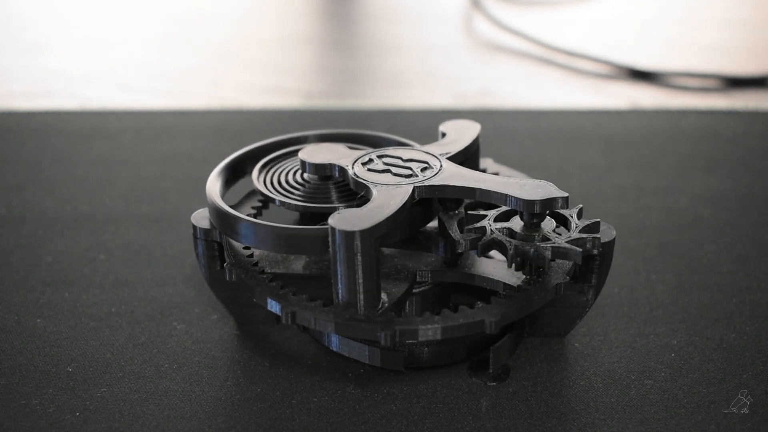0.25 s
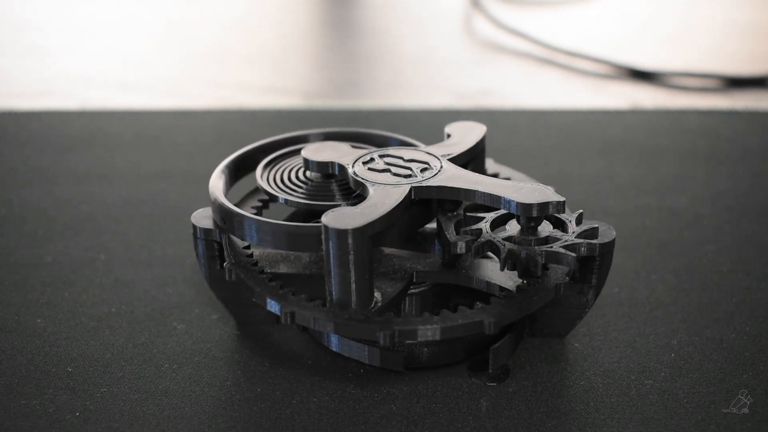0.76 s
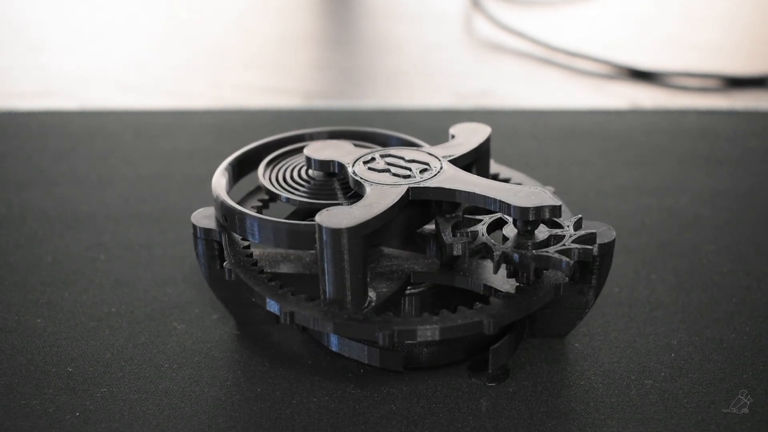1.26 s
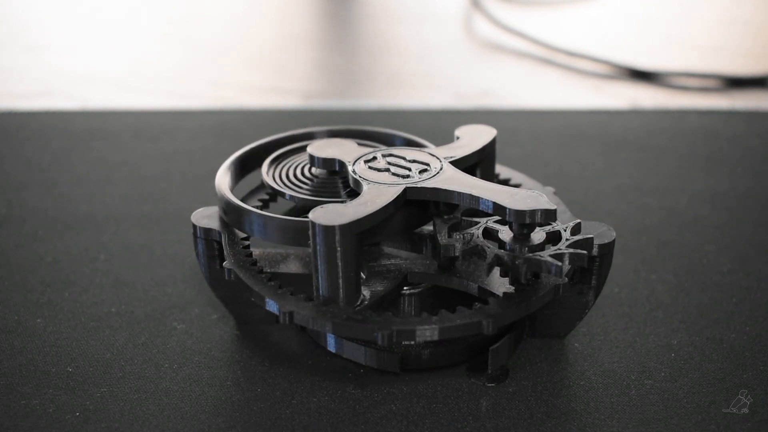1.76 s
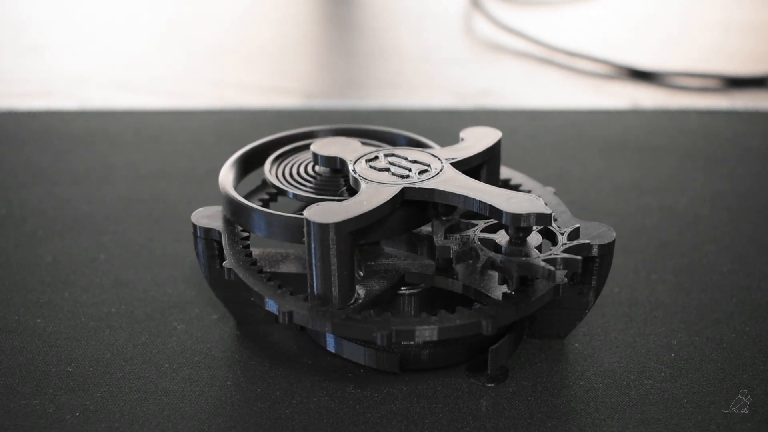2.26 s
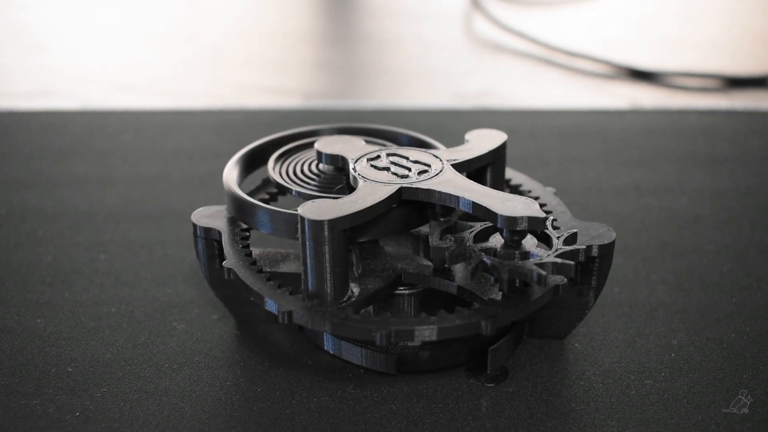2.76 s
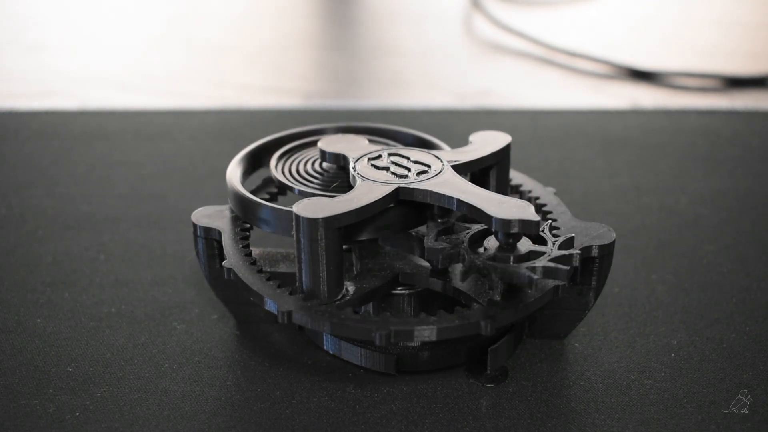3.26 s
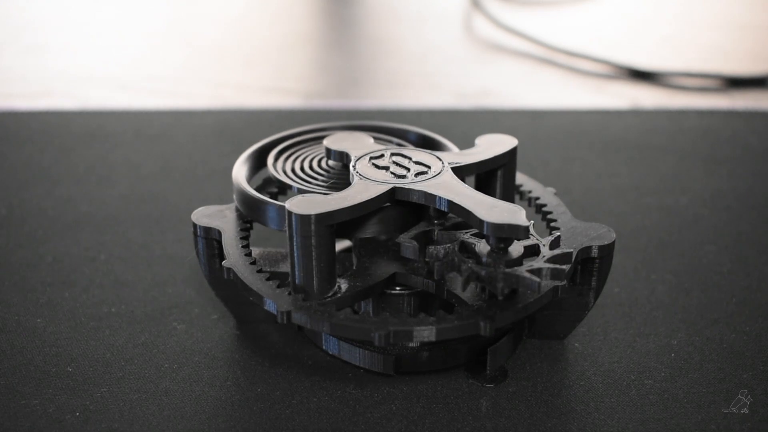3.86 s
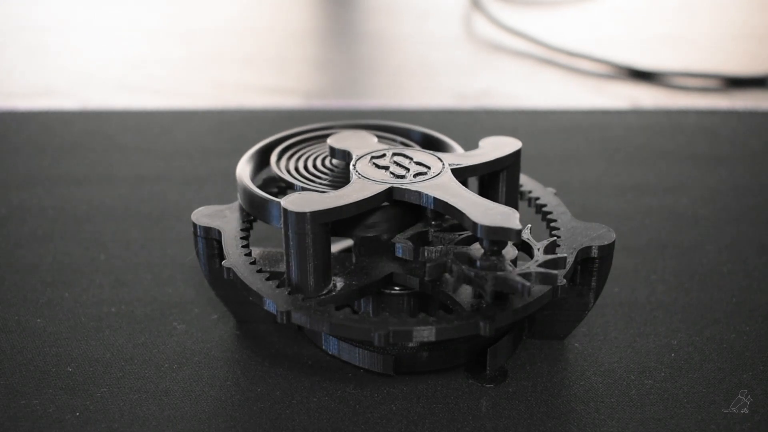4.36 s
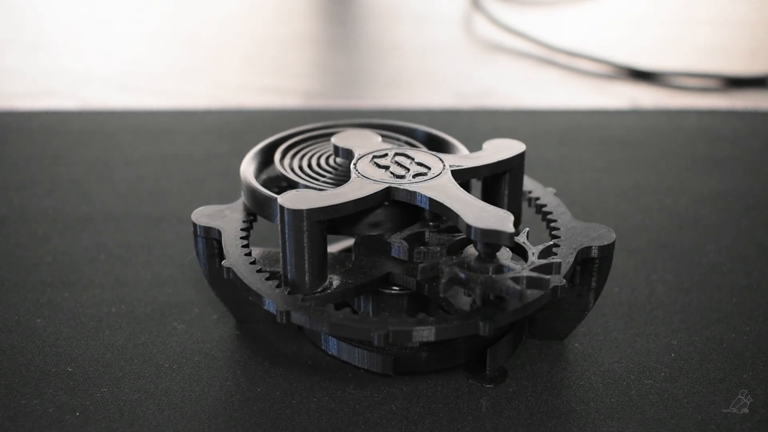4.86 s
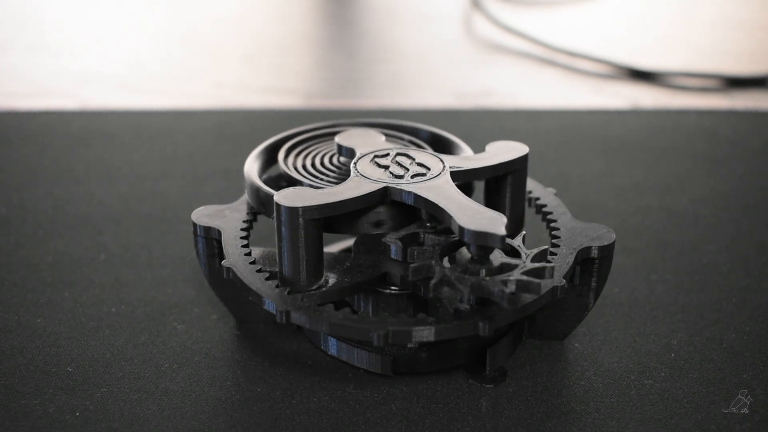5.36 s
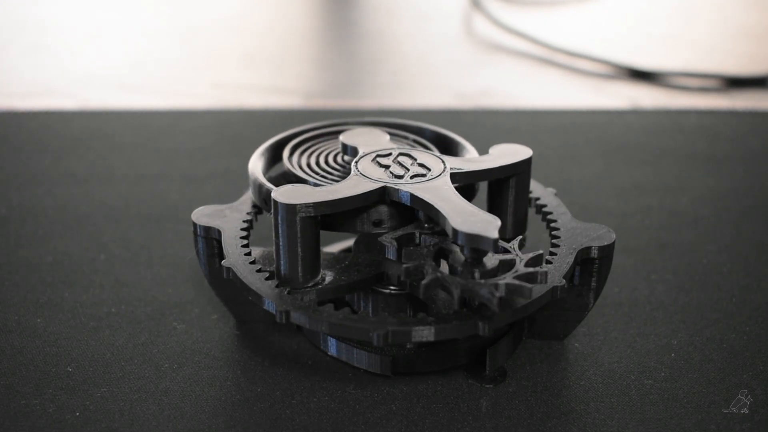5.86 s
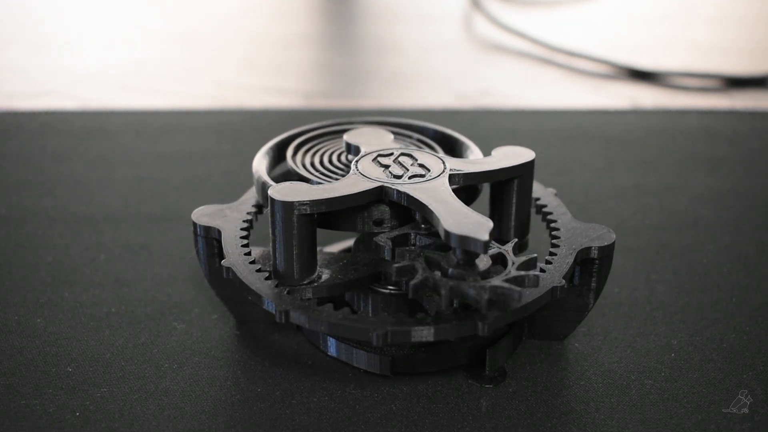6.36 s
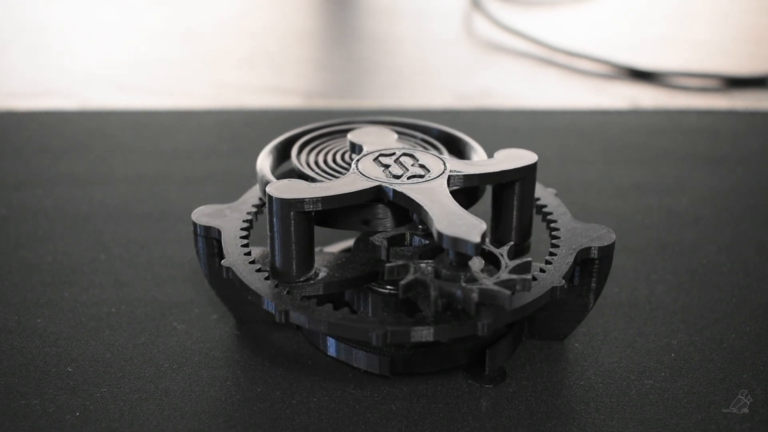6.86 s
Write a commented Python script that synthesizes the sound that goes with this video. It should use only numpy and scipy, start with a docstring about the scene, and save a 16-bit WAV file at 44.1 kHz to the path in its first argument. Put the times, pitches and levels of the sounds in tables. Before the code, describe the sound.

A plastic clockwork mechanism ticks sharply and evenly, about four times a second, over a low hum in a small room.

```python
"""A plastic clockwork escapement ticks on a desk in a small, live room, over ventilation and mains hum.
At each beat, about four a second, the balance unlocks the fork, a tooth pushes the pallet, and the
escape wheel drops with a sharp clack that rings the frame and spring. Two pallets alternate: tick, tock.
From 2.8 to 4.9 s the swing sags and the beat slows a touch, then stays so to the end.
Throughout, the timbre drifts as the carriage slowly turns."""
import sys
import numpy as np
from scipy import signal
from scipy.fft import rfft, irfft, next_fast_len
from scipy.io import wavfile
from scipy.ndimage import uniform_filter1d

SR = 44100
rng = np.random.default_rng(int(sys.argv[2]) if len(sys.argv) > 2 else 0)


def file_out(sig):
    """Save sig as 16-bit WAV at sys.argv[1]."""
    # one column per channel
    cols = np.atleast_2d(sig).T
    # limit, then scale
    lim = np.clip(cols, -1, 1)
    pcm = np.round(lim * 32767).astype(np.int16)
    wavfile.write(sys.argv[1], SR, pcm)


N = 313551

# Plastic frame. Each row: frequency in Hz, t60 in seconds, relative energy in dB on tick, on tock.
FRAME_MODES = [(1112, 0.13, -24, -18.5), (1260, 0.13, -29, -19), (1666, 0.012, -15.5, -33),
               (2170, 0.026, -14.5, -29), (2390, 0.039, -14.5, -22), (3072, 0.043, -10.5, -35),
               (4057, 0.016, -10, -4), (4500, 0.06, -20, -11.5), (5450, 0.018, -15, -7),
               (5806, 0.035, -4.5, -24), (6630, 0.054, -35, -10), (7040, 0.0059, -4.5, -7),
               (7800, 0.014, -0.5, 2.5), (8180, 0.021, 0, -4), (8750, 0.0092, 0.5, 4),
               (9510, 0.012, 5.5, 7), (9820, 0.018, -5.5, 4), (10170, 0.017, 1.5, 6.5),
               (10920, 0.015, 1, 1.5), (13180, 0.017, -3, 0.5), (14100, 0.02, -3, -14.5),
               (14700, .01, -21, -26)]
# Dry crack of a contact. Each row: frequency in Hz, relative density in dB.
CRACK_SPECTRUM = [(200, -28.5), (750, -28), (1100, -20), (2500, -14), (4800, -12), (6000, -4), (8500, -12),
                  (9800, -9.5), (12000, -7), (13300, -22), (16000, -4)]
# Dulling of a glancing contact. Each row: frequency in Hz, relative gain in dB.
GLANCE_EQ = [(500, 23.5), (1100, 18.5), (2200, 16.5), (4200, 13.5), (6500, 9), (9500, 7.5), (12000, -0.5),
             (13200, 8.5), (15000, -1)]
# Spiral spring. Each row: frequency in Hz, t60 in seconds, relative energy in dB.
SPRING_MODES = [(5050, 0.53, -13), (5520, 0.15, -32), (5500, 0.18, -10), (6730, 0.2, 1), (7200, 0.19, 25),
                (7360, 0.3, 26), (9050, 0.23, -3)]
# Unlocking to drop, tick then tock. Each row: time in seconds at wide swing, at narrow swing.
LIFT_TIMES_S = [(.0315, .042), (.0247, .0315)]
# Wide swing, tick then tock. Each row: drop, unlocking, push, low knock and top edge, all in dB.
WIDE_SWING_DB = [(8, -13, -16, 2, 1), (8, -12, -12.5, 0.5, 3)]
# Narrow swing, tick then tock. Each row: changes to the same five levels in dB.
SAG_CHANGE_DB = [(-0.57, -4.5, -0.5, -2, -2), (-0.77, -2.5, -3, -0.5, -3.5)]
# Teeth that land harder or softer. Each row: time in seconds, drop offset in dB, knock and edge offset in dB.
UNEVEN_TEETH = [(2.654, 1.5, -5), (3.141, 0.5, -1), (4.356, 0.7, 0), (4.604, -1, -3.5), (4.845, -1.5, 0),
                (5.093, 1.2, -3), (5.823, 0.2, -4), (6.558, -2, 2.5)]
# Turning carriage. Each row: time in seconds, hollow body gain in dB, bright snap gain in dB.
CARRIAGE_GAINS = [(0, 4.5, 3.5), (1.3, 6, 2.5), (2.7, 3.5, 2.5), (3.4, 3, 2), (3.9, 1, -1.5), (5.3, 2.5, 2),
                  (6.1, 0.5, -0.5), (7.1, -4, 0.5)]
# Wall echo. Each row: frequency in Hz, relative density in dB, t60 in seconds.
ROOM_BANDS = [(300, -5.5, 0.36), (740, -11.5, .33), (1020, -4, 0.32), (1560, -5, .38), (2380, -1, 0.26),
              (3560, -2, 0.35), (4700, 3, .42), (6160, 1.5, 0.46), (8860, 1, 0.34), (10400, 2, .33),
              (12100, 0, 0.29), (13300, 0.5, 0.29), (15400, -8, 0.23)]
# Hum resonances and mains lines. Each row: frequency in Hz, width in Hz, relative level in dB.
HUM_LINES = [(58.7, 1.9, -65.5), (70, 4.6, -68), (119, 0.94, -63), (143.1, 8.2, -53), (158.3, 11, -57.5),
             (207, 25, -56), (237.5, 12, -64.5), (265, 10, -62)]
# Ventilation rush. Each row: frequency in Hz, power per Hz in dB.
AIR_SPECTRUM = [(24, -92.5), (46, -110), (80, -84.5), (250, -87.5), (480, -85), (700, -90.5), (1200, -90),
                (2400, -91), (4500, -97.5), (9000, -107), (15000, -116)]

CUTOFF_HZ = 15650
LEAD_IN_SAMPLES = SR // 4
CLICK_TIME_S, ECHO_TIME_S = np.arange(4096) / SR, np.arange(16384) / SR
FIRST_BEAT_S, BEAT_S, SAG_SLOWING_S = -.01864, .242844, .0015
SAG_SPAN_S = (2.8, 4.9)
TICK_DELAY_S = (.002, .0032)   # wide swing, narrow swing
PUSH_SHARE = (.54, .5)   # lift time left at the push: tick, tock


def escapement(slide_db=-6.0, slide_lag_s=.004, rattle_db=-1.5, rattle_lag_s=.0085,
               push_scatter_db=3.1, glance_echo_db=-7.5):
    """Each beat: unlocking, push, slide along the pallet, drop; all weaken as the swing sags."""
    drops, glances = np.zeros((2, N + LEAD_IN_SAMPLES))
    wall_noise = rng.standard_normal(len(ECHO_TIME_S))
    for drop_s, pallet, sag in balance_beats():
        levels_db = np.array(WIDE_SWING_DB[pallet]) + sag * np.array(SAG_CHANGE_DB[pallet])
        drop_db, unlock_db, push_db, knock_db, edge_db = levels_db
        tooth_db, tone_db = tooth_offsets_db(drop_s)
        lift_s = np.interp(sag, [0, 1], LIFT_TIMES_S[pallet])
        push_lead_s = lift_s * PUSH_SHARE[pallet]
        unlock_s, push_s = drop_s - lift_s, drop_s - push_lead_s
        unlock_gain = from_db(unlock_db)
        push_gain = from_db(push_db + push_scatter_db * rng.standard_normal())
        add(glances, unlock_s, unlock_gain * glance(pallet, slide_s=.003))
        if pallet == 0:   # on the tick the fork rattles once in its play
            rattle = from_db(rattle_db) * glance(pallet, slide_s=.0035)
            add(glances, unlock_s + rattle_lag_s, unlock_gain * rattle)
        add(glances, push_s, push_gain * glance(pallet, slide_s=.005))
        slide = from_db(slide_db) * glance(pallet, slide_s=push_lead_s)
        add(glances, push_s + slide_lag_s, push_gain * slide)
        clack = wheel_drop(pallet, wall_noise, knock_db + tone_db, edge_db + tone_db)
        add(drops, drop_s, from_db(drop_db + tooth_db) * clack)
    glance_echo = signal.fftconvolve(glances, room_echo(wall_noise))[:len(glances)]
    return (drops + glances + from_db(glance_echo_db) * glance_echo)[LEAD_IN_SAMPLES:]


def balance_beats():
    """Beats lengthen as the swing sags. Each row: drop in seconds, pallet (0 tick, 1 tock), sag 0-1."""
    beat = np.arange(int(N / SR / BEAT_S) + 1)
    pallet = (beat + 1) % 2
    sag = np.interp(beat * BEAT_S, SAG_SPAN_S, [0, 1])
    limp_s = (1 - pallet) * np.interp(sag, [0, 1], TICK_DELAY_S)
    drop_s = FIRST_BEAT_S + beat * BEAT_S + SAG_SLOWING_S * np.cumsum(sag) + limp_s
    return zip(drop_s, pallet, sag)


def tooth_offsets_db(drop_s, scatter_db=0.25):
    """Level and tone offsets of the landing tooth; all but a few are nearly alike."""
    teeth = np.array(UNEVEN_TEETH)
    on_this_beat = np.abs(teeth[:, 0] - drop_s) < BEAT_S / 2
    return teeth[on_this_beat, 1:].sum(axis=0) - scatter_db * rng.standard_normal(2)


def wheel_drop(pallet, wall_noise, knock_db, edge_db, knock_hz=3800, edge_hz=11800,
               echo_db=-10.5, imprint_db=-18.5, spring_db=-22.5):
    """The wheel lands on a pallet; how squarely it lands sets the low knock and top edge."""
    def shelves_db(hz):
        return knock_db / (1 + (hz / knock_hz) ** 6) + edge_db * (1 - 1 / (1 + (hz / edge_hz) ** 20))

    clack = contact(pallet, rise_s=.00032, hold_s=.00016, crack_t60_s=.023, ring_db=-1, impact_db=-3)
    clack = unit_energy(colour(clack, shelves_db))
    echo = room_echo(wall_noise)
    imprint = unit_energy(signal.fftconvolve(clack, echo)[:len(echo)])   # echo coloured by this clack
    tail = from_db(echo_db) * echo + from_db(imprint_db) * imprint + from_db(spring_db) * spring_ring()
    return np.pad(clack, (0, len(tail) - len(clack))) + tail


def glance(pallet, slide_s):
    """Light sliding contact, slower and duller than the drop."""
    touch = contact(pallet, rise_s=.0006, hold_s=slide_s, crack_t60_s=.014, ring_db=-5, impact_db=-14)
    return unit_energy(colour(touch, lambda hz: at_hz(GLANCE_EQ, hz)))


def contact(pallet, rise_s, hold_s, crack_t60_s, ring_db, impact_db):
    """Tooth meets pallet: rough crack as they rub, hard impact, frame ring."""
    rise = np.minimum(CLICK_TIME_S / rise_s, 1)
    fall = decay(np.maximum(CLICK_TIME_S - hold_s, 0), crack_t60_s)
    force = unit_energy(rng.standard_normal(len(CLICK_TIME_S)) * rise * fall)
    force[np.argmax(rise)] += from_db(impact_db)
    crack = unit_energy(colour(force, lambda hz: at_hz(CRACK_SPECTRUM, hz)))
    ring = unit_energy(frame_ring(pallet) * rise)
    return unit_energy(crack + from_db(ring_db) * ring)


def frame_ring(pallet, scatter_db=2.5):
    """Frame modes, struck with new strengths and slightly shifted by the load at each blow."""
    modes = np.array(FRAME_MODES)
    hz, t60_s = modes[:, :1], modes[:, 1:2]
    strength = from_db(modes[:, 2 + pallet] + scatter_db * rng.standard_normal(len(modes)))
    shifted_hz = hz + .5 * rng.standard_normal(hz.shape) / t60_s
    phase = rng.uniform(0, 2 * np.pi, hz.shape)
    tones = np.sin(2 * np.pi * shifted_hz * CLICK_TIME_S + phase)
    return strength @ (tones * decay(CLICK_TIME_S, t60_s) / np.sqrt(t60_s))


def spring_ring(scatter_db=3):
    """Each drop shakes the spring's lightly damped modes: a thin, long ring."""
    ring = 0
    for hz, t60_s, db in SPRING_MODES:
        mode = unit_energy(np.sin(2 * np.pi * hz * ECHO_TIME_S) * decay(ECHO_TIME_S, t60_s))
        ring += from_db(db + scatter_db * rng.standard_normal()) * mode
    return unit_energy(ring)


def carriage_turn(x, body_hz=1080, body_q=5.3, snap_hz=5800, snap_q=3.7):
    """Two resonances swell and fade as the carriage turns other parts toward the listener."""
    times_s, body_db, snap_db = np.transpose(CARRIAGE_GAINS)
    for hz, q, gain_db in ((body_hz, body_q, body_db), (snap_hz, snap_q, snap_db)):
        band = signal.lfilter(*signal.iirpeak(hz, q, fs=SR), x)
        gain = from_db(np.interp(np.arange(N) / SR, times_s, gain_db))
        x = x + band * (gain - 1)
    return x


def room_echo(wall_noise, renewal=0.69, first_echo_s=0.0011, build_s=0.0035):
    """Dense wall echoes build within milliseconds and die soonest in the top treble."""
    hz = np.arange(len(ECHO_TIME_S) // 2 + 1) * SR / len(ECHO_TIME_S)
    # the walls stay put, but each contact radiates in its own pattern
    reflections = wall_noise + 2 * renewal * rng.standard_normal(len(ECHO_TIME_S))
    spectrum = rfft(reflections) * from_db(at_hz(ROOM_BANDS, hz))
    onset = np.clip((ECHO_TIME_S - first_echo_s) / build_s, 0, 1)
    centres_hz = np.linspace(0, CUTOFF_HZ, 6)
    echo = 0
    for share, centre_hz in zip(np.eye(len(centres_hz)), centres_hz):
        band = irfft(spectrum * np.interp(hz, centres_hz, share))
        t60_s = at_hz(ROOM_BANDS, centre_hz, column=2)
        echo += band * unit_energy(onset * decay(ECHO_TIME_S, t60_s))
    return unit_energy(echo)


def hum(level_db=-50.0, levelling_s=0.17, waver_db=1.48, waver_hz=5.4):
    """Mains lines and narrow bass resonances, wavering at random about a steady level."""
    drone = shaped_noise(lambda hz: sum(
        from_db(db) ** 2 / width_hz / (1 + ((hz - line_hz) / width_hz) ** 2) ** 2
        for line_hz, width_hz, db in HUM_LINES))
    levelled = drone / np.sqrt(uniform_filter1d(drone ** 2, int(levelling_s * SR)))
    waver = shaped_noise(lambda hz: (hz / waver_hz) ** 2 / (1 + (hz / waver_hz) ** 2) ** 3)
    return levelled * from_db(level_db + waver_db * waver / waver.std())


def ventilation():
    """Soft, steady rush of air."""
    return shaped_noise(lambda hz: from_db(at_hz(AIR_SPECTRUM, hz)) ** 2)


def shaped_noise(power_at):
    """Steady noise with a given power per Hz."""
    n = next_fast_len(N)
    hz = np.arange(n // 2 + 1) * SR / n
    return irfft(rfft(rng.standard_normal(n)) * np.sqrt(power_at(hz) * SR / 2), n)[:N]


def colour(x, db_at):
    """Minimum-phase filter with gain db_at(hz)."""
    n = len(x)
    hz = np.arange(n // 2 + 1) * SR / n
    cepstrum = irfft(np.log(from_db(db_at(hz))), n)
    cepstrum[1:n // 2] *= 2
    cepstrum[n // 2 + 1:] = 0
    return irfft(rfft(x) * np.exp(rfft(cepstrum)), n)


def add(track, start_s, sound):
    """Mix into a track that starts LEAD_IN_SAMPLES early."""
    i = max(round(start_s * SR) + LEAD_IN_SAMPLES, 0)
    track[i:i + len(sound)] += sound[:max(len(track) - i, 0)]


def at_hz(table, hz, column=1):
    """Interpolate a column over log frequency."""
    table = np.array(table)
    return np.interp(np.log(np.maximum(hz, 1)), np.log(table[:, 0]), table[:, column])


def decay(time_s, t60_s):
    return np.exp(-np.log(1000) * time_s / t60_s)


def unit_energy(x):
    return x / np.sqrt(np.sum(x ** 2) + 1e-20)


def from_db(db):
    return 10 ** (np.asarray(db) / 20)


def scene():
    """Ticking over hum and air, mono."""
    return (carriage_turn(escapement()) + hum() + ventilation())[None]


def record(dry):
    """Steep low-pass at CUTOFF_HZ."""
    return signal.sosfilt(signal.ellip(10, .1, 80, CUTOFF_HZ, fs=SR, output="sos"), dry)


dry = scene()
out = record(dry)
file_out(out)
```